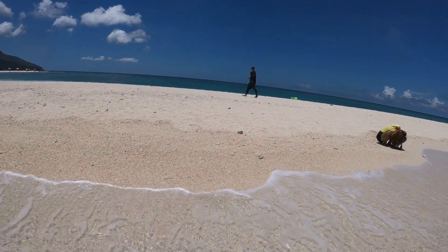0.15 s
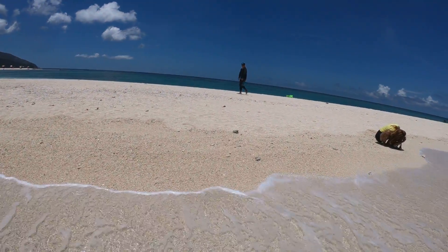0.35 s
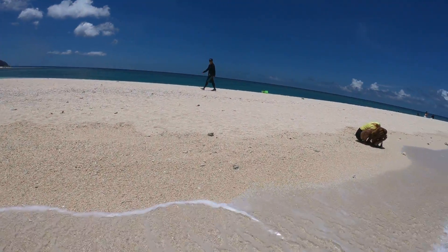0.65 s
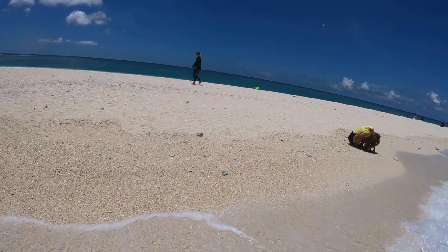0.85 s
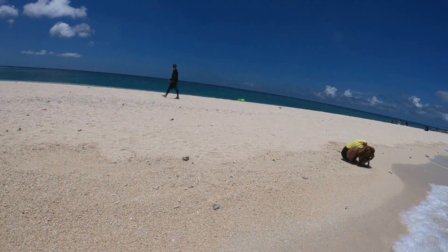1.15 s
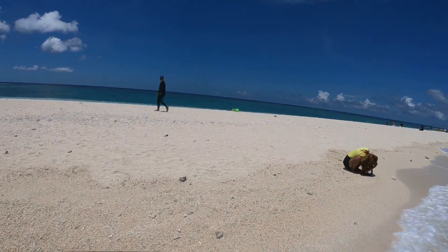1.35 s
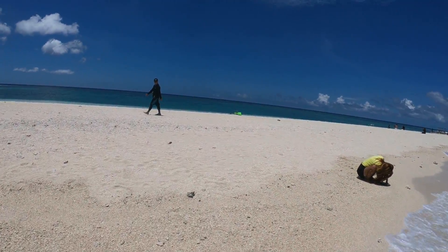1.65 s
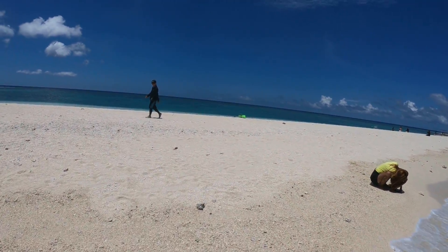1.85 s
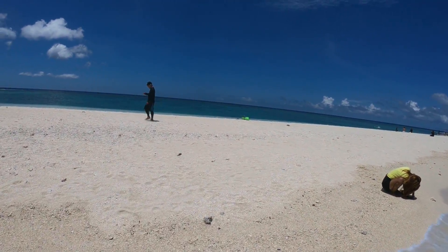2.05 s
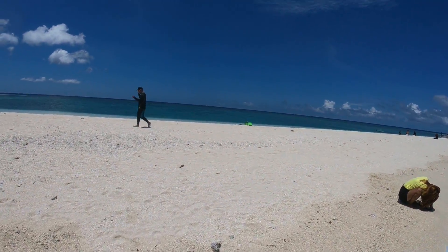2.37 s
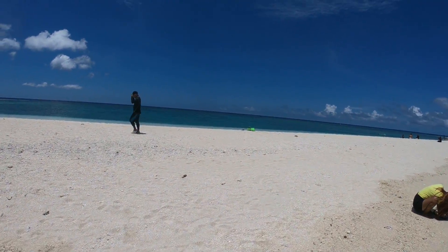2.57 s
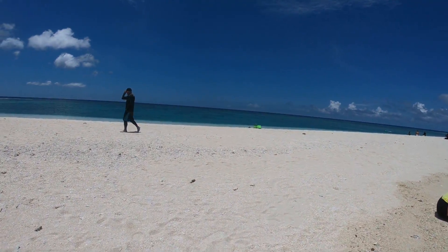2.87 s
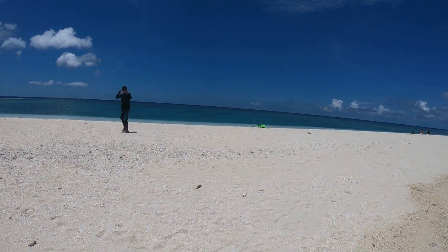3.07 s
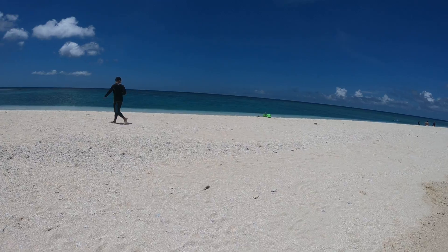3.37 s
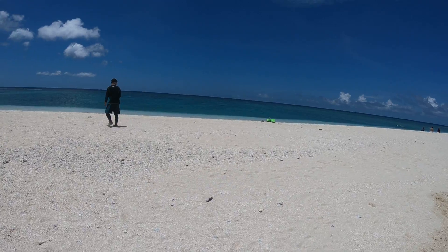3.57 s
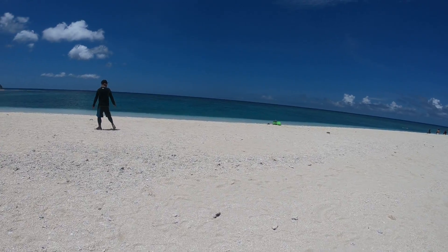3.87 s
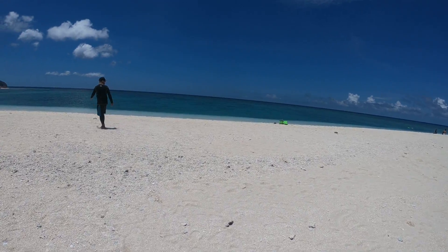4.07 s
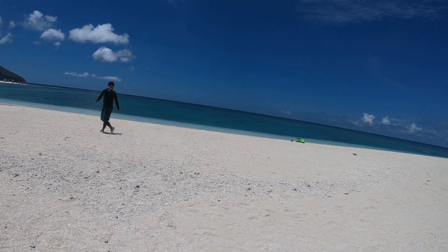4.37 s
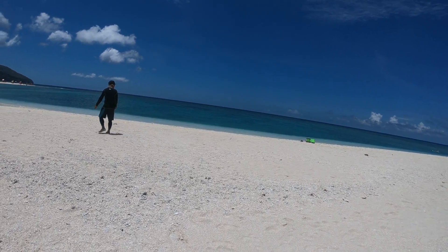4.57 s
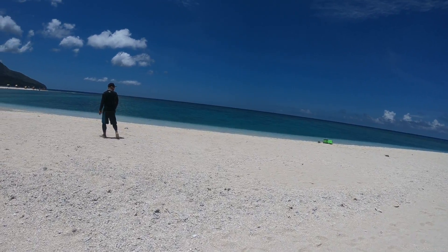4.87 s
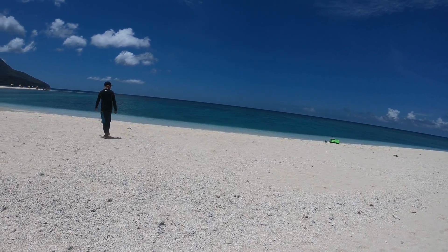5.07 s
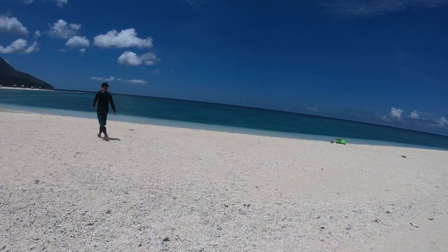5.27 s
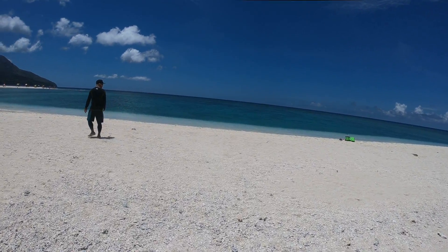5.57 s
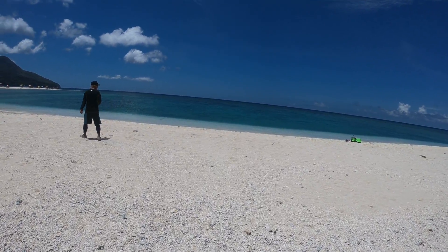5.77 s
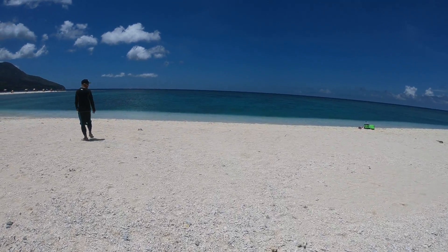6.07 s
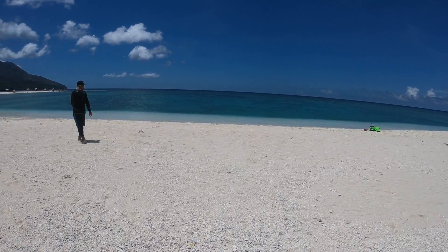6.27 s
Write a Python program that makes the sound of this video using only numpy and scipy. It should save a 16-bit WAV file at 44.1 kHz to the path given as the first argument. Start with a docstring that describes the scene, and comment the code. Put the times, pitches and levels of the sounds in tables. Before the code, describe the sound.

Open beach, heard through the plastic housing of a hand-held camera, so the water sounds slightly hollow and mid-heavy. At 0 s a small wash is already running, with wet slaps and ticks. From about 0.3 s a stronger wave swells, churning, bubbling and fizzing, loudest around 0.5 to 1.5 s, with an air-pocket blip near 0.55 s. It drains after about 2 s. Soft crunching steps in coarse coral sand fall around 1.2, 1.9, 2.5, 2.7 and 3.0 s. Near 3 s the camera turns from the water; the churning dips at 3.3 s, then another wave washes in from 3.4 to 4.2 s, duller. A weak wash follows at 4.6 s, with steps near 4.3, 4.8, 5.3, 5.8 and 6.4 s. A small rising gurgle comes at 6.1 to 6.3 s. Throughout, deep wind buffeting thumps and short low humming gusts shake the mount, while the surf steadily fades, its fizz fastest.

```python
"""Small waves break and run up a coarse coral beach: churning, bubbling and fizzing, over wind and soft steps.
The place is the water's edge; the microphones sit behind two ports in a hand-held camera's plastic housing.
Surf and foam are patchy noise mixed with damped sines; slaps, air pockets and sand grains are short rings.
The housing colours water and steps and shifts phase between the ports; wind is shaped noise and mount hum.
With distance up the beach the surf fades, fizz fastest; once the camera turns, part of the fizz is behind."""
import sys
import numpy as np
from scipy import signal
from scipy.fft import rfft, irfft, next_fast_len
from scipy.io import wavfile
from scipy.ndimage import uniform_filter1d, map_coordinates

SR = 44100
rng = np.random.default_rng(int(sys.argv[2]) if len(sys.argv) > 2 else 0)


def transcribe(u):
    """Save the signal u as a 16-bit wav file named by the first command-line argument.

    u: samples, shape (n,) or (channels, n), limited to [-1, 1]; the rate is SR.
    q: integer samples, one column per channel.
    """
    v = np.clip(np.atleast_2d(u).T, -1, 1)
    q = np.round(v * 32767).astype(np.int16)
    wavfile.write(sys.argv[1], SR, q)


N = 283122

# waves running up the sand:
# (start [s], rise [s], hold [s], time to fall 20 dB [s], strength [dB])
WAVE_RUNS = [(-.14, 0.073, 0.47, 0.14, -10), (0.289, 0.2064, 0.102, 1.74, 0.58),
             (0.681, 0.373, 0.454, 1.2, -1.43), (1.33, 0.2835, 0.448, 0.3849, -3.5),
             (2.336, 0.053, .14, 3.05, -8.5), (3.387, 0.235, 0.628, 0.5237, -0.75),
             (4.564, 0.102, 0.264, 4.1, -10.5)]
# surf colour through the housing: (frequency [Hz], left level [dB], right level [dB])
PORT_COLOUR = [(187.5, -7.5, -10), (333.5, -15, -12.5), (647, -15, -12), (886, -10.5, -8.5),
               (1115, -15.5, -5), (1235, -13.5, -7), (1520.6, -3, 1), (2270, -5.5, -1), (2621, -14.5, -1.5),
               (3228, -17.5, -11.5), (4015, -18, -19), (4460, -30.5, -21.5), (4600, -20, -15),
               (5700, -13.5, -10), (7893, -18, -13.5), (7898, -22, -20.5), (9135, -29.5, -25.5),
               (10524, -45, -44.5), (15230, -53, -49.5)]
# paths to the two ports: (frequency [Hz], left-right likeness [0-1], phase by which left leads [rad])
PORT_PATHS = [(300, 0.92, 1.5), (649, 0.72, 0.72), (1015.7, 0.44, -4), (1201, 0.55, 0), (1479.7, 0.815, -5),
              (2383, 1, -6), (3244, 0.93, -5), (4440, 0.165, -9.5), (4310, 0.265, -8.5),
              (4960, 0.824, -8.5), (6745, 0.94, -8.5), (6923, 0.72, -10.5), (9140, 0.57, -11.5),
              (15000, .1, -12)]
# foam heard from behind the housing: (frequency [Hz], relative level [dB])
BEHIND_COLOUR = [(1000, -28), (2800, -25), (3500, 3.5), (4300, -7.5), (5600, -14), (5800, 8.5), (6700, 3.5),
                 (7400, -6), (7900, -13), (9200, -13.5), (10300, -23), (11500, -34), (15000, -41)]
# slow wind pressure on the ports: (time [s], relative level [dB])
BUFFET_LEVEL = [(0.0, -46.5), (0.11, -56), (0.2, -40), (0.29, -65), (0.36, -41.5), (1.43, -38.5),
                (1.68, -57), (1.79, -40), (2.52, -44), (2.59, -33.5), (2.68, -45.5), (3.06, -47),
                (3.11, -27), (3.18, -40.5), (3.63, -42), (3.74, -32.5), (4.11, -50), (4.35, -29),
                (4.65, -52.5), (4.9, -33.5), (5.15, -48), (5.27, -38), (5.6, -39), (5.7, -34.5),
                (5.81, -48), (6.42, -41)]
# the breeze that sets the mount humming: (time [s], relative level [dB])
BREEZE_LEVEL = [(0.0, -47.5), (0.32, -71.5), (0.7, -53.5), (1.48, -41), (1.63, -54.5), (3.07, -59.5),
                (3.11, -49), (3.27, -67.5), (3.79, -55), (4.18, -59.5), (4.22, -49), (4.42, -56),
                (4.59, -68.5), (4.88, -57), (5.18, -64.5), (5.27, -52.5), (5.52, -69), (5.95, -46),
                (6.29, -68), (6.42, -54.5)]
# gusts that shake the mount: (peak time [s], half-length of the rise [s], relative level [dB])
MOUNT_GUSTS = [(0.717, 0.054, -44), (1.016, 0.093, -46), (1.218, 0.0215, -31), (1.302, 0.0394, -37),
               (1.442, 0.11, -44), (1.649, 0.0232, -48), (1.781, 0.022, -41.5), (1.906, .03, -41.5),
               (2.423, 0.0572, -38.5), (2.607, 0.0218, -42.5), (2.806, 0.0266, -46.5), (3.125, 0.0275, -37),
               (3.636, 0.049, -50.5), (3.804, 0.067, -49.5), (4.246, 0.036, -34), (4.38, 0.029, -31.5),
               (4.482, 0.0297, -46.5), (4.895, 0.0336, -44.5), (5.259, 0.0294, -46), (5.699, .025, -47.5),
               (5.806, 0.032, -40), (6.0, 0.0587, -31.5)]
# spectrum of the slow buffeting: (frequency [Hz], relative level [dB])
BUFFET_COLOUR = [(8, -1), (22, 8), (36, -1), (48, -5), (70, -33), (100, -21), (200, -26), (600, -77),
                 (2000, -120)]
# spectrum of the eddies: (frequency [Hz], relative level [dB])
EDDY_COLOUR = [(25, -35.5), (60, 9), (80, 5), (150, -7), (200, -13.5), (300, -27.5), (700, -40.5),
               (2000, -120)]
# slaps of water and knocks of loose coral, before the ports:
# (time [s], peak level [dB], pitch [Hz], ring t60 [s], spray t60 [s])
SLAPS = [(.0187, -25.5, 2212, 0.0244, 0.018), (.0438, -30.5, 2170, 0.0176, 0.045),
         (.148, -34, 995, 0.0067, 0.042), (.159, -29, 4500, 0.00138, 0.022),
         (.4046, -27, 7200, 0.0018, 0.069), (.452, -24, 2366, 0.0034, 0.21),
         (.46, -22.5, 6830, 0.00156, 0.095), (.6295, -24, 1890, 0.0055, 0.013),
         (.6775, -19.5, 1625, 0.0182, 0.015), (2.379, -36, 1100, 0.0042, 0.046),
         (2.431, -32, 790, 0.0031, 0.082), (2.557, -34.5, 810, 0.0053, 0.04),
         (3.277, -28.5, 800, 0.00194, 0.026), (3.589, -30.5, 1507, 0.0087, 0.24),
         (5.753, -35.5, 1350, 0.013, 0.06)]
# large air pockets closing, before the ports: (time [s], level [dB], starting pitch [Hz], t60 [s])
AIR_POCKETS = [(.557, -39.5, 599.4, 0.241), (2.429, -48, 502, 0.064), (2.555, -39.5, 763, 0.052),
               (3.098, -41, 457, 0.055), (3.277, -47.5, 589, 0.074), (3.49, -45, 568.4, 0.145),
               (4.791, -40, 551, 0.059)]
# steps in the coarse sand: (loudest moment [s], half-length of the rise [s],
# low scrunch level [dB], crunch level [dB], grit level [dB])
SAND_STEPS = [(1.177, 0.076, -48, -40, -51.5), (1.866, 0.12, -50, -39.5, -51.5),
              (2.457, 0.136, -61, -46, -55), (2.684, 0.151, -82.5, -53.5, -54.5),
              (2.984, 0.036, -49.5, -44.5, -54), (4.297, 0.05, -67.5, -43, -51.5),
              (4.769, 0.068, -54.5, -46, -64.5), (5.338, 0.0856, -57, -46.5, -58.5),
              (5.824, 0.0803, -55, -50.5, -59.5), (6.378, 0.117, -56, -46, -57.5)]

ROLL_LAG_S = 0.069  # the deep roll follows the first hiss of a wave
HUSH_S, HUSH_HALF_S, HUSH_DB = 3.267, 0.118, -5  # churning drops as water draws back before a wave
TURN_S, TURN_LENGTH_S = 2.87, 0.45  # the camera turns its back on the water
BEHIND_SHARE, BEHIND_DB = 0.372, 4  # share of fizz power then taken from behind, and its extra level
BEHIND_RIGHT_DB = 7.5  # foam from behind favours the right port by this much
# the top of the fizz, weaker when the surf is quiet and stronger when it is loud
FIZZ_TOP_HZ, FIZZ_TOP_RANGE_DB = 8560, 7.5
GUST_EDGE, GUST_LINGER = 1.705, 1.26  # steepness of a gust's flanks; its fall against its rise
FULL_GUST_DB, EDDY_DB, EDDY_GROWTH = -33.5, -44.5, 0.465  # eddies in a full gust; their dB per dB of gust
GURGLE_S, GURGLE_GAP_S, GURGLE_DB = 6.115, 0.037, -37  # a short chain of pockets
GURGLE_HZ, GURGLE_STEP_HZ, GURGLE_T60_S = 936, 25, 0.041  # each pocket higher than the last
TOP_HZ = 15500


def amp(db):
    """Decibels to gain."""
    return 10 ** (np.asarray(db) / 20)


def unit(x):
    """Scale to rms 1."""
    return x / np.sqrt(np.mean(x ** 2) + 1e-20)


def unit_mid(pair):
    """Scale a stereo pair so that its centre has rms 1."""
    return pair / np.sqrt(np.mean(pair.mean(0) ** 2) + 1e-20)


def along(points, hz):
    """Each column of a table over frequency, read on a log axis."""
    f, *cols = np.transpose(points)
    return np.array([np.interp(np.log(hz + 1), np.log(f + 1), c) for c in cols])


def curves(rows):
    """One value per sample for each column after the time."""
    s, *cols = np.transpose(rows)
    return np.array([np.interp(np.arange(N) / SR, s, c) for c in cols])


def wobble(rate):
    """A smooth random curve, rate knots a second."""
    knots = rng.standard_normal(int(N * rate / SR) + 4)
    return map_coordinates(knots, [np.arange(N) * rate / SR])


def filtered(x, response):
    """x times a complex response of frequency."""
    m = next_fast_len(N + SR // 4)
    return irfft(rfft(x, m) * response(np.fft.rfftfreq(m, 1 / SR)), m)[..., :N]


def band(hz, lo_hz, hi_hz, order=10):
    """Gain of a steep band-pass."""
    low_side = 1 + (lo_hz / (hz + 1)) ** (2 * order)
    high_side = 1 + (hz / hi_hz) ** (2 * order)
    return 1 / np.sqrt(low_side * high_side)


def swell(peak_s, half_s, edge, linger):
    """A brief rounded swell of gain 1 whose fall lasts linger times its rise."""
    age = (np.arange(N) / SR - peak_s) / half_s
    return np.exp(-np.abs(np.where(age < 0, age, age / linger)) ** edge)


def steadied(x, steadiness):
    """Even out the swells of a narrow noise, keeping its drifting phase."""
    z = signal.hilbert(x, next_fast_len(N))[:N]
    return unit(z.real / (np.abs(z) + 0.363 * x.std()) ** steadiness)


def rush(patchy_db):
    """Two unrelated noises sharing patches of random gain in time and frequency."""
    z = signal.stft(rng.standard_normal((2, N)), nperseg=512)[2]
    field = rng.standard_normal(z.shape[1:])
    field = uniform_filter1d(field, size=6, axis=0)
    field = uniform_filter1d(field, size=8, axis=1)
    patchy = z * amp(patchy_db * unit(field))
    return unit(signal.istft(patchy, nperseg=512)[1][:, :N])


def bubbles(rate, lo_hz, hi_hz, cycles, spread_db, rise, size=256):
    """Two streams of bubbles or grains: damped sines, 60 dB down after cycles turns, that may rise in pitch."""
    u = rng.random((int(rate * N / SR), 4))
    hz = lo_hz * (hi_hz / lo_hz) ** u[:, :1]
    turns = hz * np.arange(size) / SR
    age = turns / cycles
    # skewed strengths, capped; the spread sets how unequal they are
    strength = amp(spread_db * np.minimum(-np.log(1 - u[:, 1:2]), np.pi))
    tones = np.sin(2 * np.pi * turns * (1 + rise * age))
    rings = strength * np.sqrt(hz / lo_hz) * amp(-60 * age) * tones
    at = (u[:, 2:3] * N).astype(int) + np.arange(size)
    bearing = 2 * np.pi * u[:, 3:]
    streams = [np.bincount(at.ravel(), (rings * g).ravel(), N)[:N]
               for g in (np.cos(bearing), np.sin(bearing))]
    return unit(np.array(streams))


def two_ports(pair, colour):
    """A shared and a differing stream reach the two ports by paths whose phase depends on frequency."""
    m = next_fast_len(N + SR // 4)
    hz = np.fft.rfftfreq(m, 1 / SR)
    likeness, lead = along(PORT_PATHS, hz)
    turn = np.arccos(np.clip(likeness, 0, 1)) / 2
    shared, differing = rfft(pair, m) * np.array([np.cos(turn), np.sin(turn)])
    shift = np.exp(.5j * lead)
    ports = np.array([(shared + differing) * shift, (shared - differing) / shift])
    return irfft(ports * colour(hz), m)[:, :N]


def housed(pair, lo_hz, hi_hz):
    """One band of surf or sand, coloured by the housing, its centre at rms 1."""
    return unit_mid(two_ports(pair, lambda hz: amp(along(PORT_COLOUR, hz)) * band(hz, lo_hz, hi_hz)))


def wave_power(lag_s):
    """Each wave builds, runs up the sand and drains away; their powers add."""
    t = np.arange(N) / SR - lag_s
    total = np.zeros(N)
    for start, rise, hold, fall, db in WAVE_RUNS:
        build = np.clip((t - start) / rise, 0, 1)
        draining = np.maximum(t - start - rise - hold, 0)
        total += (build * amp(db - 20 * draining / fall)) ** 2
    return total


def foam(power):
    """Fizz of bursting foam: duller between waves, and recoloured once it comes from behind the housing."""
    fizz = rush(patchy_db=1.5) + amp(-7.5) * bubbles(
        1600, 3514, 13750, cycles=14.9, spread_db=6.5, rise=0.025, size=96)
    behind = two_ports(rush(patchy_db=0.76), lambda hz: amp(along(BEHIND_COLOUR, hz)))
    behind = unit_mid(behind * amp([[-BEHIND_RIGHT_DB], [0]]))
    turned = np.clip((np.arange(N) / SR - TURN_S) / TURN_LENGTH_S, 0, 1) * BEHIND_SHARE
    heard = np.sqrt(1 - turned) * housed(fizz, 3540, 14600) + np.sqrt(turned) * amp(BEHIND_DB) * behind
    dull = filtered(heard, lambda hz: band(hz, 100, FIZZ_TOP_HZ))
    # at most half the range down in quiet surf, half up in loud surf
    top_db = FIZZ_TOP_RANGE_DB * (np.minimum(np.sqrt(power), 1) - 0.5)
    return dull + (heard - dull) * amp(top_db)


def surf():
    """Waves roll and churn, small bubbles seethe over the sand, and the finest burst as foam."""
    t, power = np.arange(N) / SR, wave_power(0)
    slop = wobble(28)  # the water's front breaks up unevenly

    def level(drive, wave_db, sea_db, loss_db_per_s, slop_db):
        """A wave's sound over that of the sea, fading as the camera is carried away."""
        water = np.sqrt(amp(wave_db) ** 2 * drive + amp(sea_db) ** 2)
        return water * amp(slop_db * slop - loss_db_per_s * t)

    roll = rush(patchy_db=1.7)
    churn = rush(patchy_db=0.84) + amp(-17.5) * bubbles(
        130, 539, 1359, cycles=12.1, spread_db=-1, rise=0.162, size=1024)
    wash = rush(patchy_db=1.025) + amp(-12.5) * bubbles(
        650, 1323, 3990, cycles=19.3, spread_db=1.84, rise=0.117, size=320)
    hush = amp(HUSH_DB * swell(HUSH_S, HUSH_HALF_S, edge=3.6, linger=0.97))

    roll_level = level(wave_power(ROLL_LAG_S), wave_db=-53, sea_db=-65.5, loss_db_per_s=0.0043, slop_db=1.26)
    churn_level = hush * level(power, wave_db=-51, sea_db=-59, loss_db_per_s=0.4386, slop_db=0.64)
    wash_level = level(power, wave_db=-39, sea_db=-45.5, loss_db_per_s=0.8415, slop_db=-0.54)
    fizz_level = level(power, wave_db=-48.5, sea_db=-55.5, loss_db_per_s=1.72, slop_db=0.89)
    return (roll_level * housed(roll, 163, 566.7)
            + churn_level * housed(churn, 552, 1206)
            + wash_level * housed(wash, 1295, 4920)
            + fizz_level * foam(power))


def rumble(colour, apart, steadiness):
    """Turbulent pressure on the two ports, partly their own."""
    noise = rng.standard_normal((2, N))
    shared, differing = unit(filtered(noise, lambda hz: amp(along(colour, hz))))
    shared = steadied(shared, steadiness)
    return np.array([shared + apart * differing, shared - apart * differing])


def mount_mode(hz, width_hz):
    """A resonance of the mount driven by turbulence; its phase drifts while its strength is held nearly even."""
    ringing = filtered(rng.standard_normal(N), lambda f: 1 / (1 + ((f - hz) / width_hz) ** 2) ** 2)
    return steadied(ringing, steadiness=1.0)


def wind():
    """Slow buffeting on the ports; the breeze and each gust shed eddies and shake the mount."""
    breeze = amp(curves(BREEZE_LEVEL))
    gust = amp(-17.5) * breeze
    for s, half_s, db in MOUNT_GUSTS:
        gust = gust + amp(db) * swell(s, half_s, GUST_EDGE, GUST_LINGER)

    # the two-row gains are left and right
    buffet_level = np.hypot(amp(curves(BUFFET_LEVEL) + 2.3), amp(-16.5) * gust)
    buffet = buffet_level * rumble(BUFFET_COLOUR, apart=0.287, steadiness=0.351) * amp([[-2.5], [.5]])
    eddy_level = amp(EDDY_DB) * (gust / amp(FULL_GUST_DB)) ** EDDY_GROWTH
    eddies = eddy_level * rumble(EDDY_COLOUR, apart=0.71, steadiness=0.82) * amp([[-2], [1.5]])
    shake = gust * mount_mode(118.09, width_hz=6.6) * amp([[-3.2], [2.4]])
    hum_level = np.hypot(amp(4.5) * breeze, amp(-17) * gust)
    hum = hum_level * mount_mode(139.2, width_hz=15.7) * amp([[-17], [-1]])
    return buffet + eddies + shake + hum


def splashes():
    """Water slaps and coral knocks ring through decaying spray; air pockets close with a short rising note."""
    out, t = np.zeros(N + SR), np.arange(SR // 5) / SR
    for s, db, hz, ring_t60, spray_t60 in SLAPS:
        ring = amp(-60 * t / ring_t60) * np.sin(2 * np.pi * hz * t)
        spray = rng.standard_normal(len(t)) * amp(-60 * t / spray_t60)
        spray[0] += 8  # the first impact outweighs each later droplet
        slap = signal.fftconvolve(spray, ring)[:len(t)]
        out[round(s * SR):][:len(t)] += amp(db) * slap / np.abs(slap).max()

    gurgle = []
    for k, (late, big) in enumerate(rng.standard_normal(size=(5, 2))):
        s = GURGLE_S + GURGLE_GAP_S * (k + 0.186 * late)
        gurgle.append((s, GURGLE_DB + 2 * big, GURGLE_HZ + GURGLE_STEP_HZ * k, GURGLE_T60_S))
    for s, db, hz, t60 in AIR_POCKETS + gurgle:
        onset = 1 - np.exp(-t / 0.00078)
        note = np.sin(2 * np.pi * hz * t * (1 + 0.123 * t / t60)) * onset
        out[round(s * SR):][:len(t)] += amp(db - 60 * t / t60) * note

    # the water lies to the right
    source = np.array([out[:N], np.zeros(N)])
    return two_ports(source, lambda hz: band(hz, 462, 8150)) * amp([[-2], [2.5]])


def steps():
    """Each step presses the coral sand: a low scrunch, a crunch of clicking pieces and fine grit."""
    presses = np.array([swell(s, half_s, edge=1.62, linger=1.483) for s, half_s, *_ in SAND_STEPS])
    scrunch, crunch, grit = amp(np.transpose(SAND_STEPS)[2:]) @ presses
    pieces = rush(patchy_db=3.5) + amp(-11.5) * bubbles(
        700, 1292, 3380, cycles=14.2, spread_db=0.5, rise=0, size=320)
    return (scrunch * housed(rush(patchy_db=3.0), 538, 1400)
            + crunch * housed(pieces, 1373, 3780)
            + grit * housed(rush(patchy_db=2.52), 3840, 14000))


def scene():
    """Water, wind and steps at the camera."""
    return surf() + wind() + splashes() + steps()


def record(dry):
    """The camera keeps nothing above its band limit."""
    return filtered(dry, lambda hz: hz < TOP_HZ)


dry = scene()
out = record(dry)
transcribe(out)
```